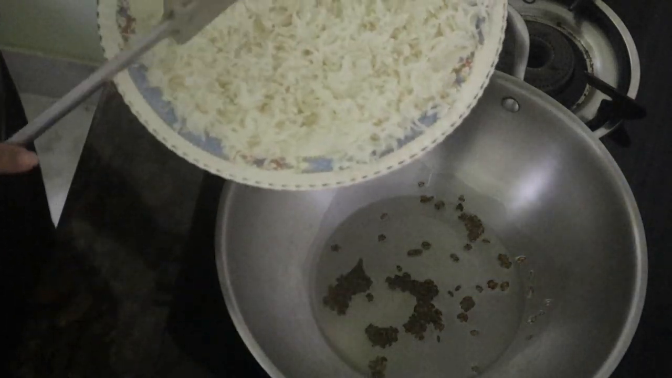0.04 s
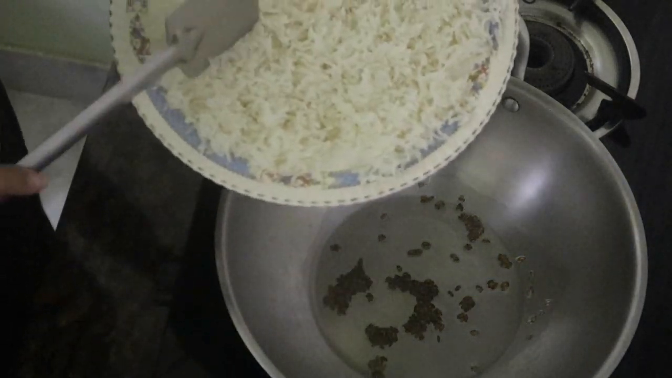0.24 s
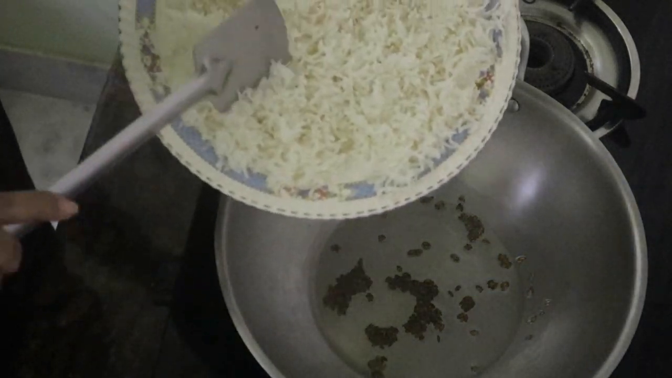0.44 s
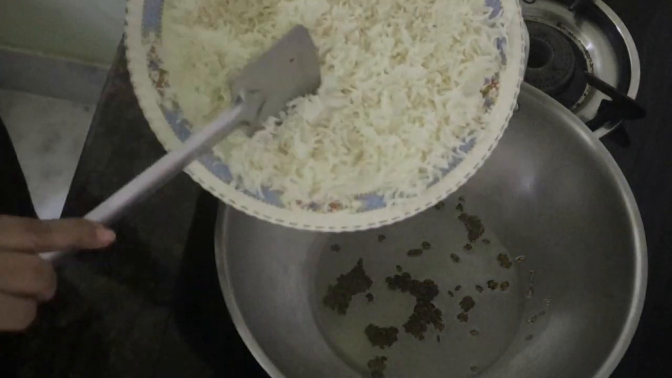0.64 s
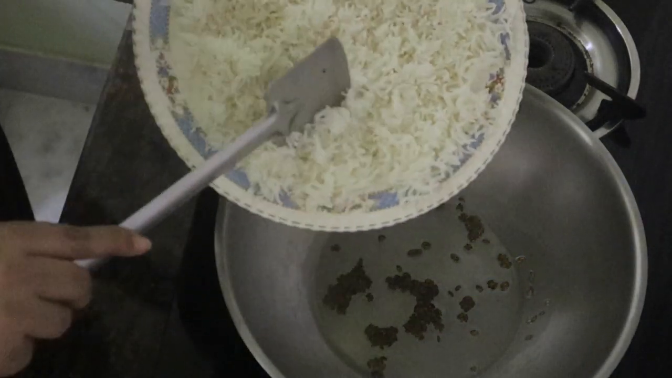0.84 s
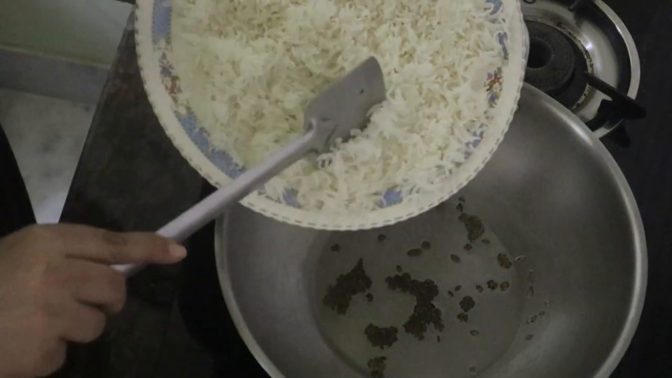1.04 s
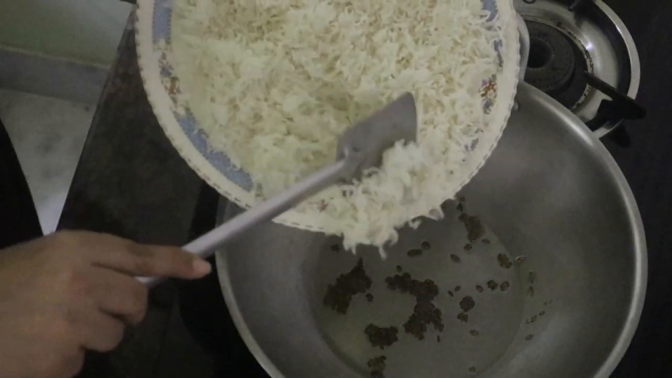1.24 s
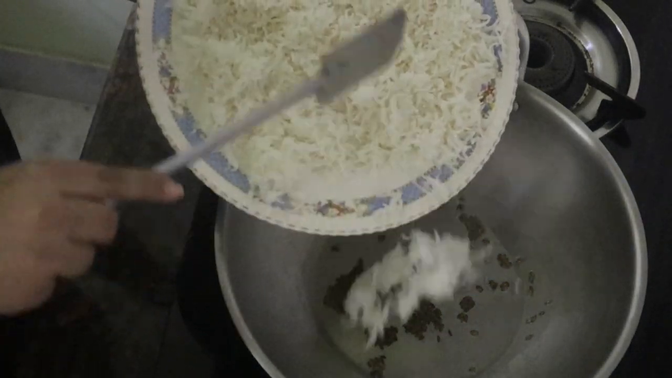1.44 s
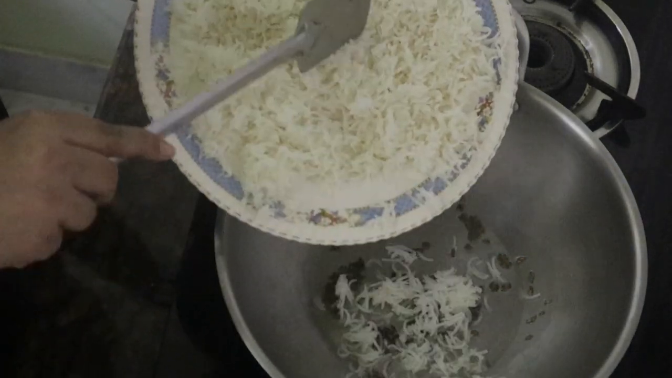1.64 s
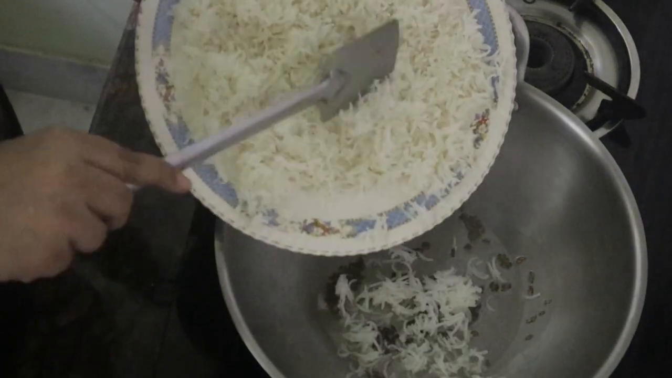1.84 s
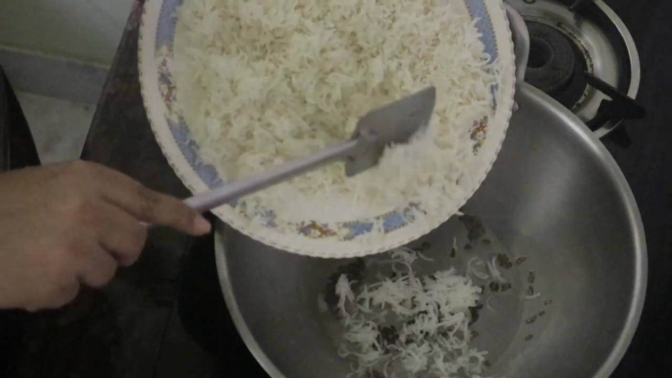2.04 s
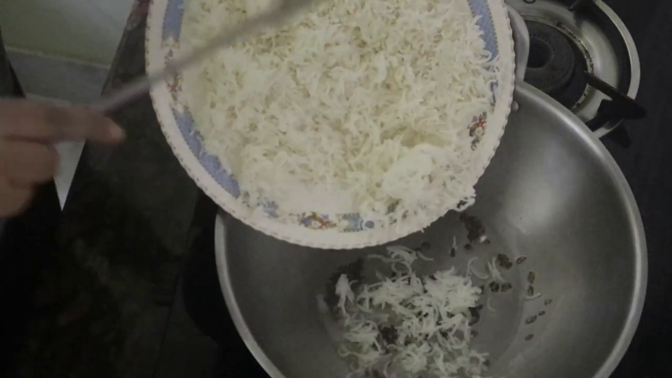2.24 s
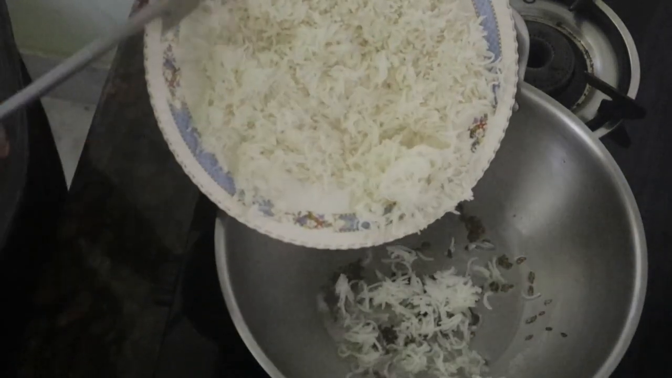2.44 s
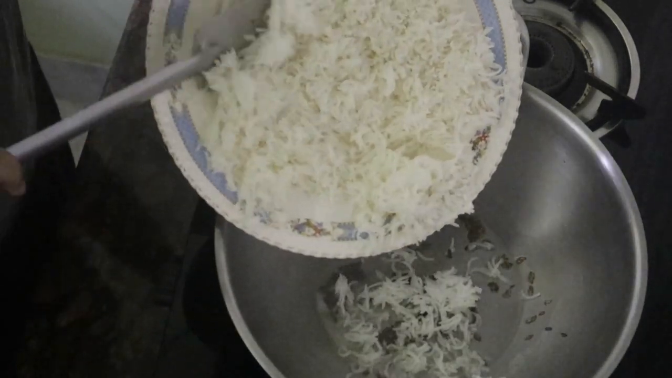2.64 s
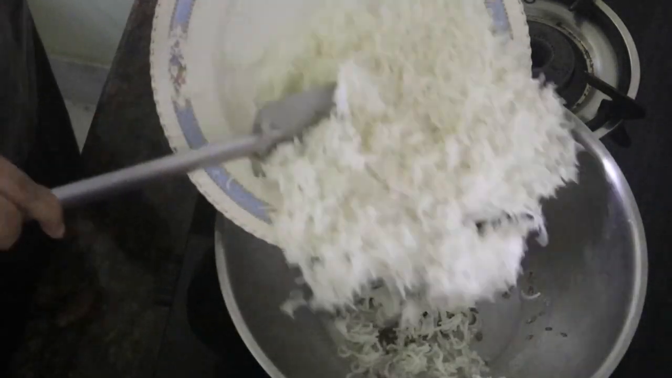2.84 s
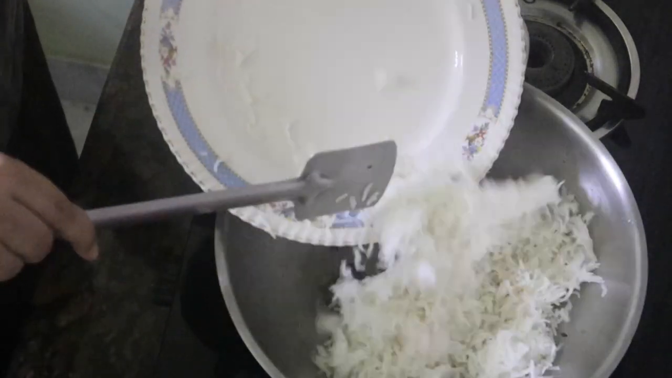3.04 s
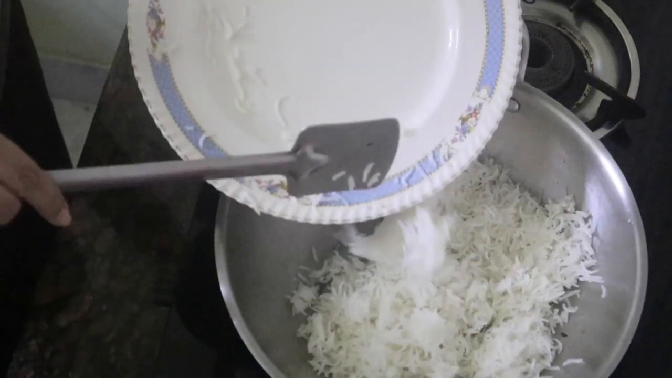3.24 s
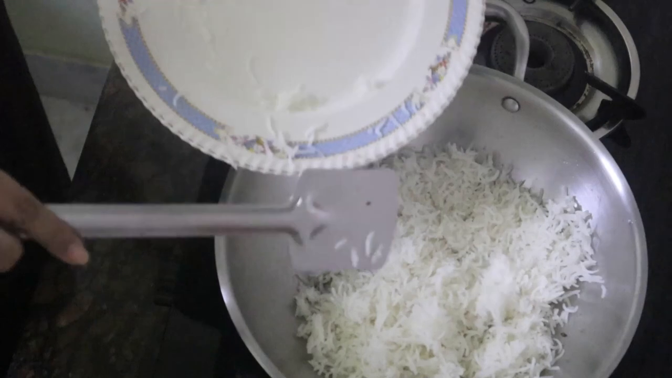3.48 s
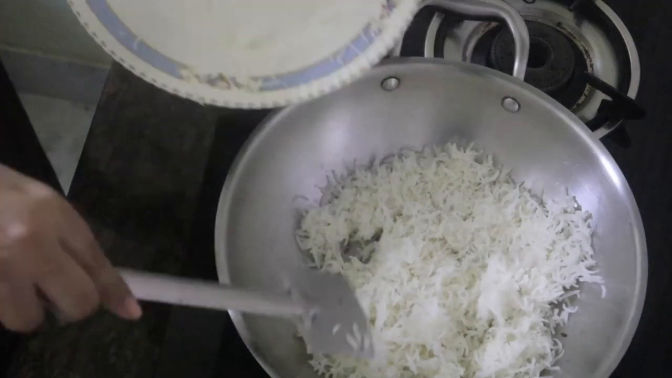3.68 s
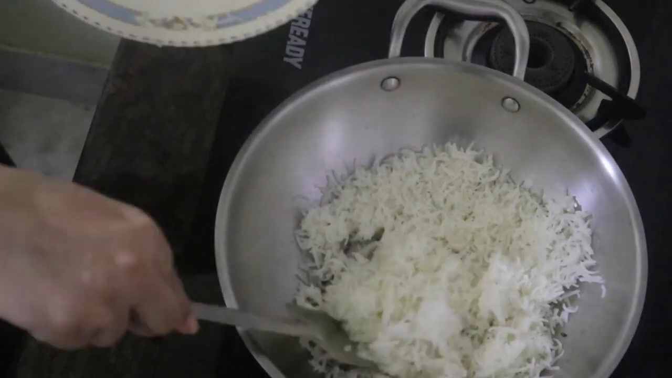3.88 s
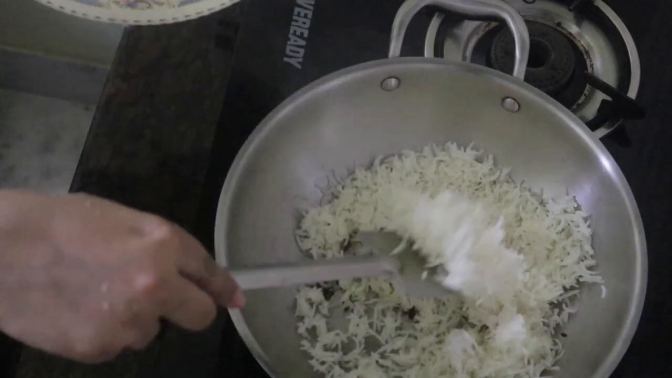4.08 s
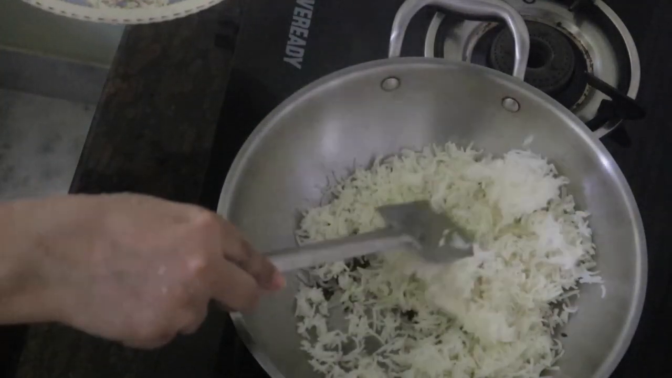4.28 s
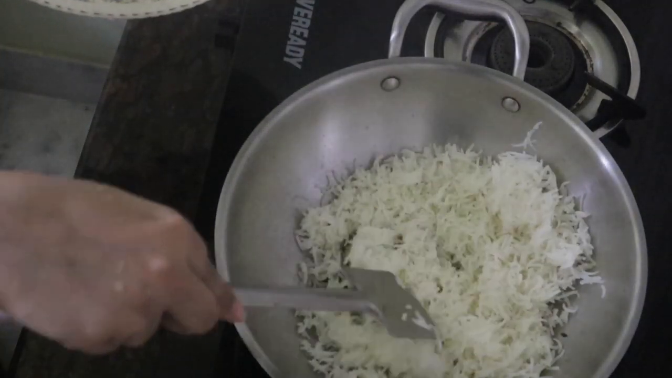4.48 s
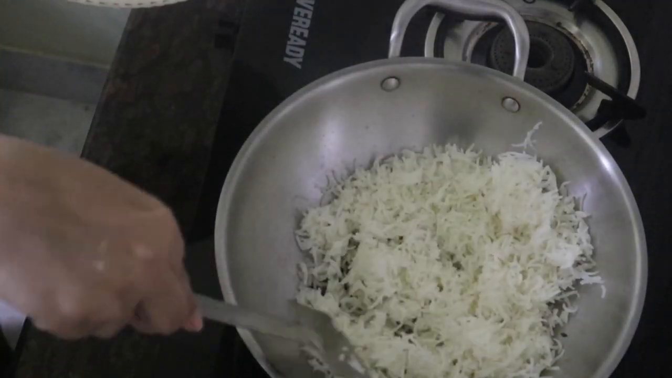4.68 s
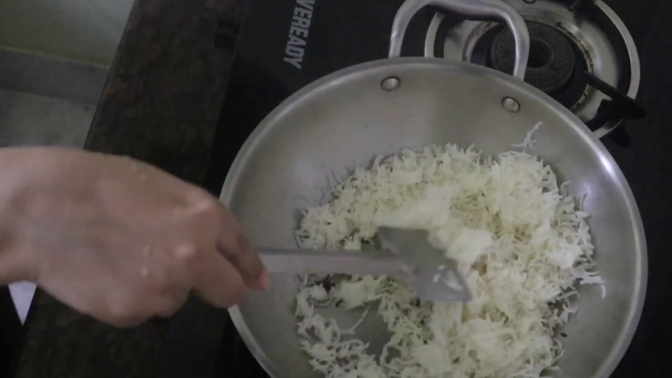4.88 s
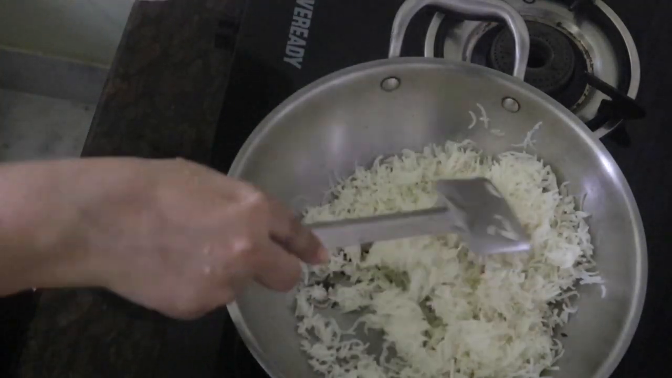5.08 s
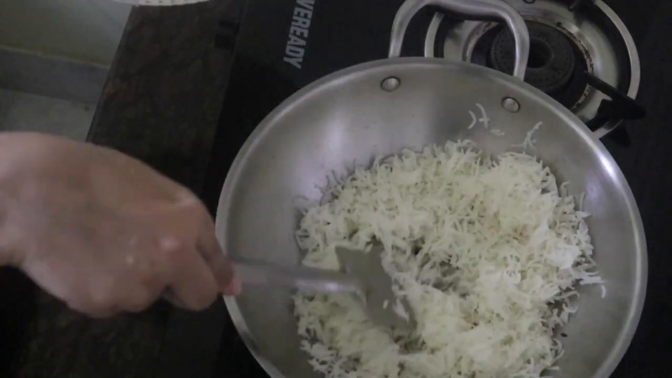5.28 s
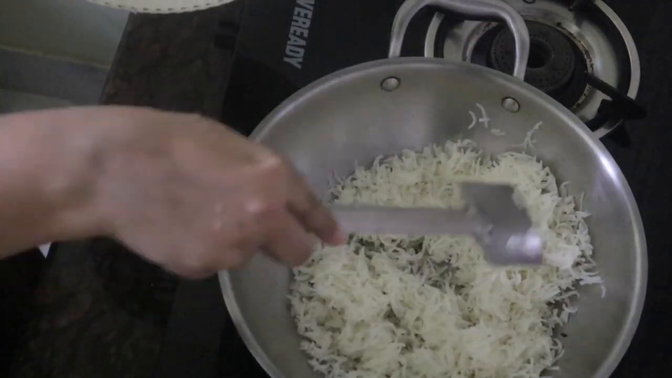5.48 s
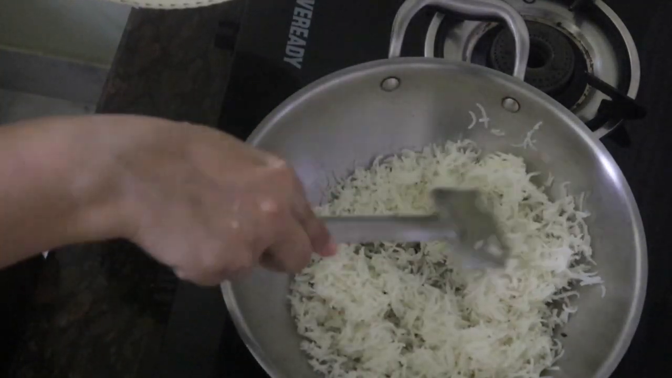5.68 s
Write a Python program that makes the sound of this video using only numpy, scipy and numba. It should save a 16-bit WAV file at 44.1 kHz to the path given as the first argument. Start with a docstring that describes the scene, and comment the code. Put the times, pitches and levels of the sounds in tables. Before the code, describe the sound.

Cooked rice drops into hot fat in a steel pan; after a quiet hum, a fierce crackling sizzle bursts out and slowly eases.

```python
"""Cooked rice dropped into hot fat

A humming kitchen (filtered noise); then rice hits fat in a steel pan. Thousands of decaying sine bursts
over steam noise make the sizzle; larger bubbles pop as noise spray and a short crack. Boil and pops
excite resonances of the pan, clumps ring bare steel, a few spatters puff air at the two microphone ports.
The camera widens the stereo image and limits loud and deep peaks; in spells the treble spreads wide.
"""
import sys
import numpy as np
from scipy import signal
from scipy.fft import rfft, irfft, next_fast_len
from scipy.io import wavfile
from scipy.ndimage import uniform_filter1d
from numba import njit

SR = 44100
rng = np.random.default_rng(int(sys.argv[2]) if len(sys.argv) > 2 else 0)


def file_out(sig):
    """Save sig as 16-bit WAV at sys.argv[1]."""
    # one column per channel
    cols = np.atleast_2d(sig).T
    # limit, then scale
    lim = np.clip(cols, -1, 1)
    pcm = np.round(lim * 32767).astype(np.int16)
    wavfile.write(sys.argv[1], SR, pcm)


N = 252252

# Levels in tables are relative; later gains apply.
# Kitchen air spectrum: f/Hz, density/dB
KITCHEN_SPECTRUM = [(20, -18), (50, -18), (74, 0.5), (123, -15), (190, -5), (340, -3.5), (430, -9),
                    (800, -7.5), (2000, -17.5), (4500, -26), (6800, -32.5), (7800, -26.5), (11500, -29.5),
                    (15500, -49)]
# Machine hum resonances: f/Hz, width/Hz, level/dB
HUM_MODES = [(75, 47, -12.5), (200, 12, -7), (329.3, 2.1, -13.5)]
# Kitchen over time: t/s, level/dB, deep rumble re air/dB
KITCHEN_LEVELS = [(0, -43, -7.5), (1.4, -44, -3.5), (1.8, -48, -5), (2.3, -51, -13), (2.7, -44, -21),
                  (3.4, -52, -11), (4.0, -54.5, -12), (4.6, -57.5, -15), (5.72, -61, -7)]
# Directions in the room: right port lead/ms, left minus right/dB
ROOM_SPOTS = [(-0.17, 0.054), (0.1, -0.17), (0.091, 0.093), (-0.077, -0.17)]
# Places in the pan: right port lead/ms, left minus right/dB
PAN_SPOTS = [(0.064, -1.6), (0.074, -1.5), (0.078, 0.5), (-0.00045, -1), (-0.11, -3.5)]
# Boil over time: t/s, middling bubbles/dB, then re those: fine fizz/dB, large bubbles/dB, pan ring/dB
BOIL_LEVELS = [(1.44, -61, -1, 7, 0), (1.465, -50, 21.5, -3, -11), (1.507, -50, 22, -4, -14),
               (1.532, -44, 22, -6, -18), (1.55, -41, 16, 0, -20), (1.585, -30, 9, -8, -18),
               (1.6, -24, 9.5, -19, -20), (1.62, -23.5, 8.5, -38, -20), (1.652, -18, 5, -40, -28),
               (1.7, -19.5, 8.5, -13, -19), (1.76, -22.5, 4.5, -12, -21), (1.82, -22, 9, -9.5, -24.5),
               (2.1, -25.5, 4.5, -6, -20), (2.16, -23, 3, -10, -17), (2.19, -24.5, 4.5, -11, -16),
               (2.258, -29, 6, -5, -13), (2.295, -23.5, 4.5, -7, -18), (2.35, -26.5, 7, -6, -17),
               (2.4, -27, 8.5, -4, -16), (2.45, -28.5, 8, -5, -10.5), (2.66, -22.5, 6, -1.5, -10.5),
               (2.78, -27, 10.5, 0, -9), (2.98, -26, 2, -7.5, -15), (3.03, -20.5, 5.5, -9, -14.5),
               (3.2, -23.5, 9, -0.5, -9.5), (3.34, -26, 4, -2.5, -11.5), (3.47, -26, 9, -5, -14),
               (3.9, -28.5, 6.5, -5.5, -19), (4.01, -21, 6.5, -7, -18), (4.07, -25, 7.5, -6.5, -21),
               (4.2, -28, 4.5, -5, -14), (4.385, -31, 8, -5, -18.5), (4.415, -27, 4, -7.5, -22),
               (4.46, -28.5, 4.5, -2, -15), (4.52, -31.5, 5.5, -4.5, -13), (4.78, -35, 6.5, -6.5, -22),
               (4.9, -29, 4.5, -7.5, -22.5), (5.25, -36.5, 7.5, -4, -10), (5.257, -24.5, 3, -7, -29),
               (5.27, -31, 2.5, -4, -38), (5.36, -31.5, 6.5, -4.5, -12.5), (5.65, -36, 7.5, -7.5, -21.5),
               (5.72, -32.5, 6, -7, -16)]
# Bubble spectrum: f/Hz, gain/dB
SIZZLE_SPECTRUM = [(250, -38), (480, -31), (600, -11), (1200, -14.5), (2500, -4), (4500, 3.5), (6500, 1),
                   (9000, 2), (11500, 3.5), (12900, -4.5), (14000, -12.5), (16000, -18.5)]
# Pan resonances: f/Hz, width/Hz, level/dB
PAN_MODES = [(537, 7.2, 5.5), (547, 6.1, 6.5), (695, 11.2, 7), (732.6, 6, 8), (871, 14, 2),
             (1185, 93, -3.5), (1828, 16, 10), (1990, 9.9, 6), (1940, 12, -5), (2110, 30, -4),
             (2570, 180, 1), (3156, 27, 12), (3390, 19, -21), (3980, 41, 7)]
# Rice load on the lowest pair of pan modes: t/s, gain/dB
RICE_LOAD = [(1.44, 0), (2.3, 4.5), (2.95, 1), (3.1, -8.5), (3.8, -1), (4.6, 0), (5.72, -8)]
# Bumps that set the pan ringing: t/s, level/dB
RING_BUMPS = [(2.137, -29), (2.161, -46), (3.158, -32), (3.29, -39), (4.477, -34)]
# First clumps on bare steel: t/s, level/dB
CLUMP_LANDINGS = [(1.453, -45.5), (1.485, -43.5), (1.503, -48), (1.52, -49), (1.591, -44), (1.632, -43.5)]
# Bare pan modes: f/Hz, level/dB, t60/s
BARE_PAN_MODES = [(977, 6, 0.47), (1920, 10, 0.1), (3110, 3, 0.23), (3730, 2, 0.27), (4730, 2, 0.12),
                  (5780, 0, 0.12), (6510, 1, 0.12)]
# Single large bubbles: t/s, level/dB, pitch f/Hz, bright spray re pop/dB
LARGE_POPS = [(1.4898, -24.5, 6700, -4), (1.4748, -28, 6970, 0), (1.5115, -27, 7000, 0),
              (1.5295, -24, 6510, 5), (1.535, -30, 6450, -2), (1.544, -34, 3000, 0),
              (1.5575, -30, 3500, -1), (1.5665, -12, 5780, 7.5), (1.5765, -26, 3500, 5),
              (1.598, -30, 5720, 4), (1.6715, -18, 6230, 16.5), (1.7172, -18, 6760, 10),
              (1.75, -26, 3730, -4), (1.8294, -13, 6660, -4), (2.0034, -9, 4550, -1),
              (2.1178, -10, 3960, -1), (2.175, -14, 4190, -6), (2.2018, -15, 4780, -6),
              (2.2183, -16, 3900, -3), (2.2422, -11.5, 3620, 8), (2.2692, -29, 4890, -5),
              (2.2998, -20, 2620, 10), (2.3296, -13, 2730, 5), (2.3557, -17, 3290, 7),
              (2.372, -24, 4500, -8), (2.385, -17, 3500, 0), (2.4071, -13.5, 2220, 11.5),
              (2.4214, -16.5, 2600, 5), (2.4307, -4, 6640, 2), (2.4753, -9, 5720, 7),
              (2.5032, -7.5, 4430, -3), (2.5622, -21, 6800, -5), (2.5686, -11, 2830, -3),
              (2.599, -20, 5000, -4), (2.6271, -3, 3340, 2), (2.6425, -5, 2430, -3),
              (2.6804, -14, 2680, -14), (2.6873, -9, 2700, -22), (2.711, -10.5, 2960, -4),
              (2.714, 0, 4500, -1.5), (2.735, -8, 6300, -6), (2.789, -12, 2300, 9), (2.7975, -8.5, 2480, 2),
              (2.8079, -11, 3160, -8), (2.8764, -17, 2790, -15), (2.9086, -6, 3470, -1),
              (2.936, -10.5, 3460, -10), (2.9532, -19, 4500, 2), (3.0042, -16, 2620, -3),
              (3.027, -12, 6000, -12), (3.0464, -5.5, 6870, 3), (3.153, -4.5, 3980, -27),
              (3.1803, -8, 2380, -28), (3.2226, -11, 3190, -22), (3.229, -8, 3700, -8),
              (3.273, -8.5, 3860, 0), (3.295, -18, 2500, 3), (3.3115, -4, 4200, -10),
              (3.3474, -24, 3900, -18), (3.3782, -9.5, 2590, -15), (3.4979, -7.5, 6570, -1),
              (3.5365, -11.5, 6000, -6), (3.9161, -6.5, 3170, -18), (3.9868, -18, 3670, -2),
              (4.0904, -8.5, 3180, -20), (4.1492, -6, 3900, -19), (4.1794, -18.5, 2630, -17),
              (4.2019, -19, 3300, -14), (4.2741, -16.5, 3650, 3), (4.2844, -15, 3000, -18),
              (4.3064, -11.5, 6800, -6), (4.4136, -11, 3120, -14), (4.4748, -17, 4000, 6),
              (4.478, -5.5, 4200, -31), (4.4854, -8, 4380, -20), (4.5347, -20, 2850, -1),
              (4.5708, -26, 2750, -8), (4.7001, -16.5, 4010, -12), (4.732, -24, 4100, -12),
              (4.7456, -15, 5380, -21), (4.9554, -20, 2770, -7), (5.0566, -18, 3140, -8),
              (5.1063, -15, 3420, -21), (5.1795, -17.5, 4870, 2), (5.2147, -21, 4000, -12),
              (5.2535, -8, 2800, -12), (5.2764, -26, 6800, -5), (5.3381, -30, 3800, -17),
              (5.4267, -23, 3460, 2), (5.444, -18, 3500, -10), (5.6233, -29, 4290, -11),
              (5.6878, -21, 4570, -14)]
# Echoes off the pan wall: delay/ms, level/dB
WALL_ECHOES = [(0.45, -8), (0.85, -14)]
# Close spatters: t/s, level/dB, push time scale/ms, right port lag/ms
AIR_PUFFS = [(2.5052, -3.5, 0.95, 0.33), (2.7158, -15, 0.26, 0.16), (3.311, -51, 2, .05),
             (4.478, -23, 0.17, .05), (5.058, -17, 0.17, 0.14), (5.447, -21.5, 0.19, 0.26)]
# Spectrum of the difference of the ports: f/Hz, gain/dB
SIDE_SPECTRUM = [(40, 13), (300, 8.5), (1000, 5.5), (2500, 4), (5000, 0), (7200, -1), (7800, -15),
                 (11000, -11.5), (16000, -1)]
# Spells of wide treble: start t/s, length/s
WIDE_SPELLS = [(1.437, 0.095), (1.568, 0.032), (1.978, 0.073), (2.075, 0.072), (2.171, 0.11),
               (2.311, 0.073), (2.443, 0.015), (2.491, 0.0067), (2.638, 0.131), (2.868, 0.14),
               (5.048, 0.02), (5.411, 0.062)]
# Treble edge for the spells: f/Hz, gain/dB
TREBLE_EDGE = [(6900, -41), (7700, 6)]

FLUTTER_DB, FLUTTER_PER_S = 1.6, 12  # random wavering of each bowl mode
BUMP_FADE_S = 0.013
TEAR_S = 0.001134  # spray builds up for this long before the crack
POP_PAN_DB, POP_PAN_SPREAD_DB, POP_LEAD_MS = -3, 2.5, 0.07  # left minus right; right port leads
SNAP_DB, SNAP_S = 7.5, .00004  # sharp dent opening each crack: drive, time scale
OVERTONE, OVERTONE_DB = 1.55, -29  # second ring of a crack: multiple of its pitch, drive
POP_RING_DB = -14  # drive of the pan modes by pops
CRACKLE_PER_S, CRACKLE_HZ = 80, (2340, 6740)
CRACKLE_DB, CRACKLE_SCATTER_DB = 0, 1.8  # offset from the boil, random excess scale
CRACKLE_FROM_S = 1.61  # once the rice lies in the fat
SPELL_CENTRE_DB, SPELL_SIDE_DB = -2, 10.5  # sum and difference; TREBLE_EDGE then scales the change
SPELL_EDGE_S = 0.0024
DUCK_HZ, DUCK_TOP, DUCK_LATE_S = 150, 0.045, 0.0064  # limiter's late answer to deep pressure
DUCK_ATTACK_S, DUCK_RELEASE_S = 0.0064, 0.029
TOP_HZ = 15900


def undb(db):
    """Amplitude factor of a level in dB."""
    return 10 ** (np.asarray(db) / 20)


def level(x, db):
    """Scales x to an RMS level in dB."""
    return x * undb(db) / np.sqrt(np.mean(x ** 2))


def curve(table):
    """Columns of (s, value, ..) rows, interpolated per sample."""
    s, *columns = np.transpose(table)
    return [np.interp(np.arange(N) / SR, s, c) for c in columns]


def sos(order, hz, kind="low"):
    """Butterworth sections."""
    return signal.butter(order, hz, kind, fs=SR, output="sos")


def colour(x, table):
    """Zero-phase spectral shaping by (Hz, dB) points."""
    hz, db = np.transpose(table)
    size = next_fast_len(N + 4096)
    f = np.arange(size // 2 + 1) * SR / size
    gain = undb(np.interp(np.log(f + 1), np.log(hz), db))
    return irfft(rfft(x, size) * gain, size)[..., :N]


def ports(x, lead_ms, pan_db):
    """One direction of arrival: time and level difference at two close ports."""
    size = next_fast_len(N)
    f = np.arange(size // 2 + 1) * SR / size
    turn = np.exp(1j * np.pi * f * lead_ms / 1000)  # half the lead per port
    both = rfft(x, size) * np.array([undb(pan_db / 2) / turn, turn / undb(pan_db / 2)])
    return irfft(both, size)[:, :N]


def ring(x, hz, width_hz):
    """One resonance, gain 1 at its centre."""
    return signal.lfilter(*signal.iirpeak(hz, hz / width_hz, SR), x)


def walk(rate):
    """Random levels held 1 / rate s and smoothed twice; RMS 1."""
    k = int(SR / rate)
    held = np.repeat(rng.standard_normal(N // k + 1), k)
    return level(uniform_filter1d(uniform_filter1d(held, k), k)[:N], 0)


def kitchen():
    """Air as wavering shaped noise, far machines as narrow resonances, from all ROOM_SPOTS."""
    out = 0
    for lead_ms, pan_db in ROOM_SPOTS:
        air = level(colour(rng.standard_normal(N), KITCHEN_SPECTRUM), 0) * undb(0.86 * walk(8.2))
        hum = sum(level(ring(rng.standard_normal(N), hz, w), db) for hz, w, db in HUM_MODES)
        out = out + ports(air + hum, lead_ms, pan_db)
    air_db, deep_db = curve(KITCHEN_LEVELS)
    deep = signal.sosfiltfilt(sos(2, 135), out)
    return undb(air_db) * (level(out - deep, 3.4) + undb(deep_db) * level(deep, 0.2))


def flares(rate, size_db, fade_s):
    """Sudden outbreaks of boiling that decay exponentially: a gain from 1 upward."""
    u = rng.random((int(rate * N / SR), 2)).T
    size = undb(size_db - 1.7 * np.log(1 - .98 * u[1]))
    kicks = np.bincount((u[0] * N).astype(int), size, N)
    return 1 + signal.lfilter([1], [1, -np.exp(-1 / (fade_s * SR))], kicks)


@njit
def bursts(n, at, hz, cycles, size):
    """Each bubble is a decaying sine of a few cycles, cut at about -40 dB."""
    out = np.zeros(n + 2000)
    for k in range(len(at)):
        step = 2 * np.pi * hz[k] / SR
        p, z = np.exp(1j * step - step / (2 * np.pi * cycles[k])), size[k] + 0j
        for i in range(at[k], at[k] + min(1999, int(4.6 * cycles[k] * SR / hz[k]))):
            z *= p
            out[i] += z.imag
    return out[:n]


def swarm(lo_hz, hi_hz, rate, scatter_db, cycles, steam_db, flare_db):
    """Bubbles of one size range over band-passed steam noise, at every spot in the pan."""
    out, band = 0, sos(2, [lo_hz, hi_hz], "band")
    for lead_ms, pan_db in PAN_SPOTS:
        u = rng.random((int(rate * N / SR), 3)).T
        hz = lo_hz + (hi_hz - lo_hz) * u[1]
        size = np.sqrt(hz) * undb(-scatter_db * np.log(1 - .997 * u[2]))  # few strong, many weak
        bubbles = bursts(N, (u[0] * N).astype(np.int64), hz, np.full(len(hz), cycles), size)
        steam = signal.sosfilt(band, rng.standard_normal(N))
        boil = (level(bubbles, 0) + level(steam, steam_db)) * flares(9.4, flare_db, 0.0023)
        out = out + ports(boil * undb(1.26 * walk(24.827)), lead_ms, pan_db)
    return out


def bumps():
    """Sudden gains on the pan ring that fade exponentially."""
    t = np.arange(N) / SR
    return sum((t > s) * undb(db) * np.exp(-np.abs(t - s) / BUMP_FADE_S) for s, db in RING_BUMPS)


def sizzle():
    """Bubbles of three size ranges surge together; middling and large ones excite the pan modes."""
    boil_db, fizz_db, large_db, ring_db = curve(BOIL_LEVELS)
    started = np.arange(N) / SR - BOIL_LEVELS[0][0] > 0
    surge = started * undb(0.98 * walk(19) + 0.12 * walk(60) + 0.048 * walk(360))
    surge = surge * flares(22, -11.0, 0.0097)
    fine = swarm(6320, 15900, 2500, scatter_db=2.9, cycles=2.0, steam_db=-3.5, flare_db=-3)
    middle = swarm(2850, 6900, 800, scatter_db=3.4, cycles=1.9, steam_db=-2.5, flare_db=-23)
    large = swarm(320, 3100, 700, scatter_db=2.0, cycles=2.3, steam_db=-0.22, flare_db=-35.0)
    fine = signal.sosfilt(sos(3, 5200, "high"), fine)

    blows = middle + large
    load_db, = curve(RICE_LOAD)
    bowl = rim = 0
    for hz, width_hz, db in PAN_MODES:
        mode = ring(blows, hz, width_hz)
        if hz < 1500:
            mode_db = db + FLUTTER_DB * walk(FLUTTER_PER_S) + (hz < 600) * load_db
            bowl = bowl + undb(mode_db) * mode
        else:
            rim = rim + undb(db) * mode
    bowl = signal.sosfilt(sos(2, 450, "high"), bowl)

    fine, middle, large = (level(colour(v, SIZZLE_SPECTRUM), 0.47) for v in (fine, middle, large))
    large = large + level(rim, -11.0)
    pan_ring = (started * undb(boil_db + ring_db) + bumps()) * level(bowl, 0.26)
    bubbles = undb(fizz_db) * fine + middle + undb(large_db) * large
    return undb(boil_db) * surge * bubbles + pan_ring


def landings():
    """Soft clumps set the bare pan singing: slow-onset decaying sines."""
    out, t = np.zeros(N), np.arange(N) / SR
    for s, db in CLUMP_LANDINGS:
        age = np.clip(t - s, 0, None)
        onset = 1 - np.exp(-age / 0.0048)
        for hz, mode_db, t60 in BARE_PAN_MODES:
            out += undb(db + mode_db - 60 * age / t60) * np.sin(2 * np.pi * hz * age) * onset
    return ports(out, *PAN_SPOTS[0])


def crackle():
    """Rows of lesser pops at random moments, levels following the boil."""
    start = CRACKLE_FROM_S
    u = rng.random((int(CRACKLE_PER_S * (N / SR - start)), 4)).T
    s = start + u[0] * (N / SR - start)
    boil_db = np.interp(s, *np.transpose(BOIL_LEVELS)[:2])
    db = boil_db + CRACKLE_DB - CRACKLE_SCATTER_DB * np.log(1 - .97 * u[1])
    hz = CRACKLE_HZ[0] * (CRACKLE_HZ[1] / CRACKLE_HZ[0]) ** u[2]
    return list(zip(s, db, hz, -14 + 16 * u[3]))


def pops():
    """Droplets fly as the skin tears, then a crack rings at the bubble's pitch and echoes off the wall."""
    out, t = np.zeros((2, N + 900)), np.arange(900) / SR
    dull, bright = sos(3, [1200, 7500], "band"), sos(3, [7000, 11900], "band")
    after = np.clip(t - TEAR_S + np.array([[0], [POP_LEAD_MS / 1000]]), 0, None)
    rows = LARGE_POPS + crackle()
    for (s, db, hz, spray_db), u in zip(rows, rng.standard_normal((len(rows), 2, 900))):
        crack = -2.8 * np.sin(2 * np.pi * hz * after) * np.exp(-after * hz / 0.5)
        overtone = np.sin(2 * np.pi * OVERTONE * hz * after) * np.exp(-after * hz / 2.7)
        snap = after / SNAP_S * np.exp(-after / SNAP_S)
        crack = crack - undb(OVERTONE_DB) * overtone - undb(SNAP_DB) * snap
        echoes = sum(undb(echo_db) * np.roll(crack, int(ms * SR / 1000), axis=1)
                     for ms, echo_db in WALL_ECHOES)
        drops = (u[0] + 1.03 * u) * np.clip(t / TEAR_S, 0, 1)  # partly shared by the ports
        dull_spray = 0.32 * signal.sosfilt(dull, drops) * np.exp(-after / 0.004)
        bright_spray = undb(spray_db) * signal.sosfilt(bright, drops) * np.exp(-after / 0.001)
        pop = crack + echoes + dull_spray + bright_spray
        pan_db = POP_PAN_DB + POP_PAN_SPREAD_DB * u[1, 0]
        i = int(s * SR)
        out[:, i:i + len(t)] += pop * undb(db + np.array([[pan_db], [-pan_db]]) / 2)
    return signal.sosfiltfilt(sos(2, 1100, "high"), out[:, :N])


def struck(cracks):
    """Every pop knocks the pan: the rectified pops drive its modes, broadened."""
    knock = np.abs(cracks)
    return undb(POP_RING_DB) * sum(undb(db) * ring(knock, hz, w + 20) for hz, w, db in PAN_MODES)


def puffs():
    """A short dent of air pressure that swings back, sooner if shorter; later and stronger at right."""
    out, ms = np.zeros((2, N + 4000)), np.arange(4000) * 1000 / SR
    for s, db, length_ms, late_ms in AIR_PUFFS:
        tau = np.clip(ms - np.array([[0], [late_ms]]), 0, None) / length_ms
        push = -4.1 * tau * np.exp(-1.5 * tau) * np.array([[1], [1.15]])
        push = signal.sosfilt(sos(2, 48 / length_ms, "high"), push)
        i = int(s * SR)
        out[:, i:i + len(ms)] += push * undb(db)
    return out[:, :N]


def scene():
    """Pan, spatters and kitchen at the two ports."""
    boil, cracks = sizzle(), pops()
    knocked_pan = ports(struck(cracks.mean(axis=0)), *PAN_SPOTS[0])
    return boil + cracks + knocked_pan + puffs() + landings() + kitchen()


def spread(mid, side):
    """During a spell the treble of the sum drops and that of the difference rises."""
    t = np.arange(N) / SR
    gate = sum(1. * (t > s) * (t < s + length) for s, length in WIDE_SPELLS)
    on = uniform_filter1d(gate, int(SPELL_EDGE_S * SR))
    return [v + (undb(db * on) - 1) * colour(v, TREBLE_EDGE)
            for v, db in ((mid, SPELL_CENTRE_DB), (side, SPELL_SIDE_DB))]


@njit
def limit(x, top, attack, release):
    """Gain that holds the followed peak under top; attack and release are per-sample coefficients."""
    gain, e = np.ones(len(x)), 0.
    for i in range(len(x)):
        e += (x[i] - e) * (attack if x[i] > e else release)
        gain[i] = min(1., top / (e + 1e-9))
    return gain


def record(dry):
    """Shapes the port difference, spreads the treble in spells, limits, rounds overshoots, cuts the top."""
    mid, side = spread((dry[0] + dry[1]) / 2, colour((dry[0] - dry[1]) / 2, SIDE_SPECTRUM))
    wide = np.array([mid + side, mid - side])
    loud = signal.lfilter([.012], [1, .012 - 1], np.abs(wide).max(axis=0))
    wide = wide * limit(loud, 0.27, 1 / (0.00021 * SR), 1 / (0.15 * SR))  # attack, release in s
    deep = np.roll(np.abs(signal.sosfilt(sos(2, DUCK_HZ), mid)), int(DUCK_LATE_S * SR))
    wide = wide * limit(deep, DUCK_TOP, 1 / (DUCK_ATTACK_S * SR), 1 / (DUCK_RELEASE_S * SR))
    wide = wide / (1 + wide ** 4) ** .25
    top_cut = signal.ellip(10, .2, 80, TOP_HZ, fs=SR, output="sos")
    return np.clip(signal.sosfilt(top_cut, wide), -1, 1)


dry = scene()
out = record(dry)
file_out(out)
```